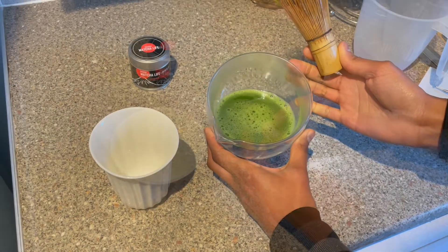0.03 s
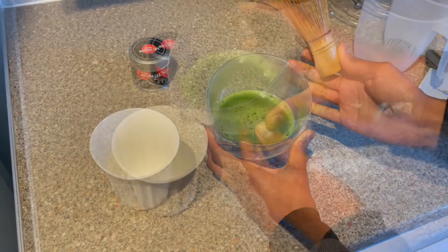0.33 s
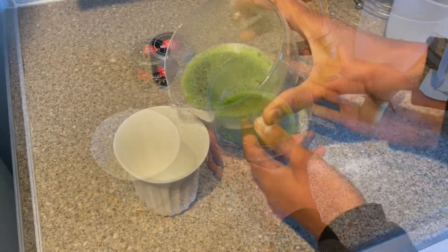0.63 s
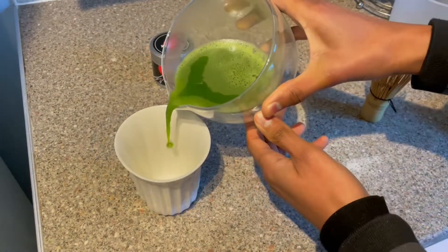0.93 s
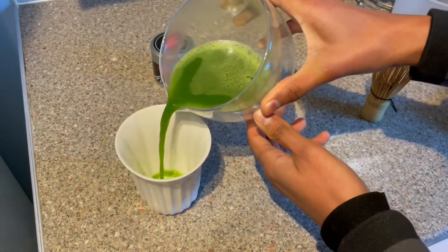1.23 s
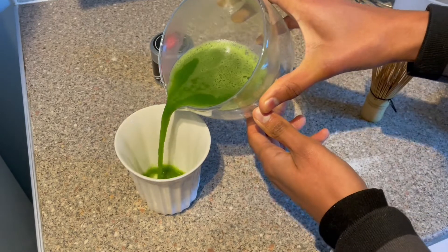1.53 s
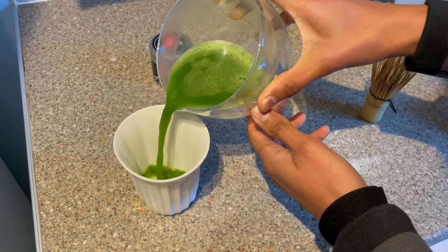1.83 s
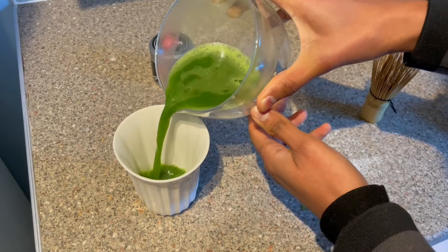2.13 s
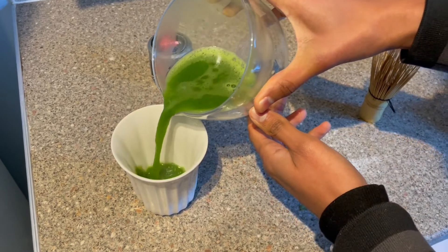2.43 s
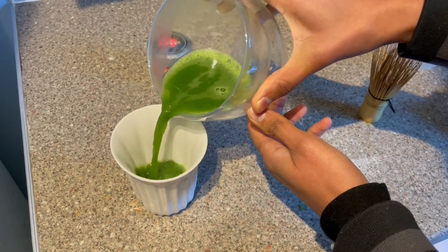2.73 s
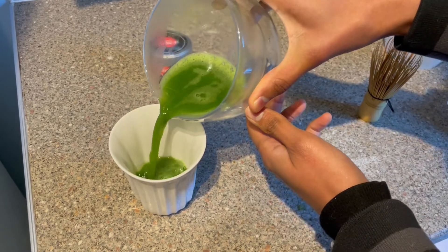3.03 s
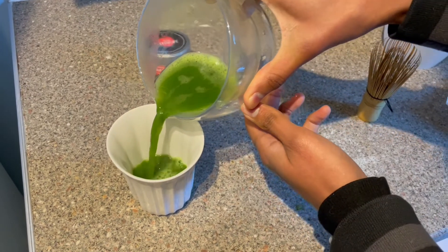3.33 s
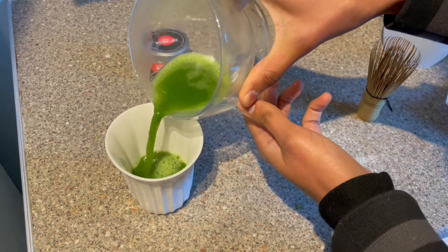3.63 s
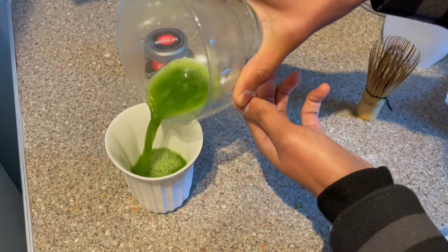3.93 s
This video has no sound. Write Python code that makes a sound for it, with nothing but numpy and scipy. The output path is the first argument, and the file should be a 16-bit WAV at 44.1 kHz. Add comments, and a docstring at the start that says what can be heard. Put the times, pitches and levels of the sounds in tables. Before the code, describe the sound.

Tea is poured into a cup, close up in a kitchen. Something is first set on the counter with one clink, then a thin, foamy stream hisses, splashes and bubbles over a faint, throbbing appliance hum.

```python
"""At a kitchen counter, close up, tea is poured from a glass bowl into a cup.
First something is set down with one knock and a clink. Then a thin, foamy stream hisses on the cup's
bottom. As a pool gathers, the stream slaps it and traps bubbles, which ring and sound through the cup.
Behind it all, two appliance motors hum slightly out of step, so their sound throbs."""
import sys
import numpy as np
from scipy import signal
from scipy.fft import rfft, irfft, next_fast_len
from scipy.io import wavfile
from scipy.ndimage import map_coordinates

SR = 44100
rng = np.random.default_rng(int(sys.argv[2]) if len(sys.argv) > 2 else 0)


def pcm_store(signal):
    """Save signal as 16-bit PCM."""
    levels = np.round(np.clip(np.atleast_2d(signal), -1, 1) * 32767)
    wavfile.write(sys.argv[1], SR, levels.astype(np.int16).T)


N = 176400  # 4 seconds

# Levels in the tables are relative. A fade_s is the time taken to die away by 60 dB.
# tones of the two motors: pitch_hz, level_db
MOTOR_TONES = [(100, -47), (105.865, -51.5), (200, -73), (400, -71), (425.6, -75)]
# tone colour of the room's soft rush and low rumble: frequency_hz, level_db
AIR_COLOUR = [(130, -9.5), (205, -11), (240, -5.5), (268, -14), (305, -6), (400, -16.5), (520, -19),
              (710, -23.5), (1300, -34), (2500, -44.5)]
RUMBLE_COLOUR = [(20, -28.5), (35, -13.5), (55, 0), (120, -3.5), (150, 0), (190, -16), (300, -42.5)]
# ringing tones of the thing set down: pitch_hz, level_db, fade_s
CLINK_TONES = [(986,-17,0.49), (1732,-11,0.23), (2287,-17.5,0.74), (2343,-17.5,0.79), (2520,0,0.17),
               (2570,-7,0.16), (2660,-17,0.38), (2856,-4.5,0.14), (2870,-19,0.2), (3117,-4,0.27),
               (3620,-22,0.2), (6220,-25.5,0.23)]
# dull tones of the counter: pitch_hz, level_db
COUNTER_TONES = [(305, 1), (441, -10), (545, -3.5), (641, 2.5), (940, 0.5), (1170, -12.5), (1396, -12)]
# tone colour of the knock and its sharp crack: frequency_hz, level_db
KNOCK_COLOUR = [(170, -6), (300, -4), (620, -1.5), (1000, -8), (1600, -19), (2700, -8), (4000, -26.5)]
CRACK_COLOUR = [(2500, -13), (4200, -26.5), (5600, -1), (7000, -8), (10000, -1.5), (15000, -4)]
# how loud the foam, small bubbles and large bubbles are over time: time_s, level_db
FOAM_LEVELS = [(.62,-100), (.73,-87.5), (.8,-100.5), (.92,-85), (1.02,-82), (1.5,-76.5), (2.09,-70.5),
               (2.35,-74), (2.9,-77), (4,-76.5)]
SMALL_BUBBLE_LEVELS = [(.9,-98), (1.02,-76), (1.15,-92), (1.5,-85), (1.7,-75), (1.78,-75), (1.98,-64),
                       (2.19,-65.5), (2.35,-73.5), (2.53,-70), (2.7,-81.5), (3.5,-78.5), (4,-74)]
LARGE_BUBBLE_LEVELS = [(1.5,-90), (1.85,-78), (2.15,-75), (2.38,-71.5), (2.53,-68), (2.7,-77), (3.5,-74.5),
                       (4,-67.5)]
# tone colour of the foam, a droplet's tick and a slap: frequency_hz, level_db
FOAM_COLOUR = [(1500, -9), (3000, -28), (6000, -7), (8800, 1.5), (11500, -7), (14000, 0.5), (16000, -16.5)]
TICK_COLOUR = [(3000, -39), (7000, -4.5), (11000, -2.5), (13500, -4), (16000, 1)]
SLAP_COLOUR = [(300, 5.5), (600, 8), (1200, -5), (1700, -2.5), (2600, -11.5), (4400, -12.5), (7000, -23)]
# droplet ticks, splashes on the cup's wall, first drops, slaps on the pool: start_s, level_db
TICK_HITS = [(0.9606, -48), (1.0085, -42), (1.0607, -52.5), (1.207, -57.5), (1.7529, -47), (2.0767, -43),
             (2.1056, -53), (2.1156, -43.5), (2.1872, -48.5), (2.5058, -48.5), (2.684, -49.5),
             (2.7223, -52), (2.8109, -51.5)]
SPLASH_HITS = [(1.009, -44), (1.6526, -45.5), (1.69, -47.5), (1.7133, -43.5), (1.907, -46.5), (1.953, -42),
               (2.0168, -39), (2.116, -48), (2.1938, -39), (2.2333, -42), (2.315, -48), (2.568, -40),
               (3.2595, -46), (3.7633, -47)]
FIRST_DROP_HITS = [(1.011, -54), (1.063, -63), (1.204, -59)]
SLAP_HITS = [(2.236, -51), (2.45, -52.5), (2.506, -53), (2.637, -60), (2.719, -55), (2.808, -53),
             (2.832, -52), (2.868, -56), (2.882, -52), (3.04, -48), (3.289, -51), (3.419, -50),
             (3.586, -58.5), (3.604, -50), (3.963, -44)]
# bubbles that stand out: start_s, level_db, pitch_hz
SINGLE_BUBBLES = [(1.59, -46.5, 3700), (1.811, -53, 2100), (1.909, -47, 2340), (1.952, -43.5, 5600),
                  (1.979, -47, 2250), (2.005, -47.5, 2160), (2.02, -41.5, 4230), (2.053, -50.5, 2100),
                  (2.075, -34, 7460), (2.084, -37, 1580), (2.117, -42, 2360), (2.15, -47.5, 2210),
                  (2.184, -39.5, 5770), (2.238, -35, 1720), (2.296, -51, 960), (2.451, -41.5, 970),
                  (2.541, -46.5, 880), (2.561, -41.5, 890), (2.636, -52, 990), (2.749, -38, 243),
                  (2.88, -49, 2160), (3.767, -47.5, 3200), (3.828, -48, 4200)]
# pitches at which the cup and the air in it ring: pitch_hz, width_hz, level_db
CUP_RESONANCES = [(975, 51, 3), (1810, 160, -5), (2249, 49, 8.5), (3443, 68, 7.5), (4360, 220, 2),
                  (5150, 100, -0.5)]
# how long the kitchen echoes: frequency_hz, fade_s
ROOM_FADES = [(200, 0.3), (1000, 0.34), (3000, 0.21), (7000, 0.17), (15000, 0.15)]
# how alike room sound is on the left and right: frequency_hz, likeness (1 or more is identical)
STEREO_LIKENESS = [(100, 0.7), (250, 0.96), (450, 0.42), (900, 0.01), (4000, -0.24), (7500, 0),
                   (11000, 1.2)]
# how far a near sound's wave is ahead on the left: frequency_hz, lead_radians
LEFT_LEAD = [(400, 0), (520, .4), (660, 1.8), (850, .5), (1100, .3), (1600, -.8), (2500, 1), (3500, 1.7),
             (4500, -.2), (5800, -1), (7600, -2.8), (8800, -3.25), (11000, -4.7), (13300, -6.2)]
# how much louder a near sound is on the left: frequency_hz, left_minus_right_db
LEFT_BALANCE = [(400, 1), (660, -2), (1000, 8.5), (1600, 4.5), (2300, 2.5), (3500, 2.5), (5400, -3.5),
                (7500, 0.5)]

TOP_HZ = 15900  # the highest frequency kept
TIME = np.arange(N) / SR
SIDES = np.array([[.5], [-.5]])  # left, right


def amp(db):
    """Turn decibels into a number to multiply by."""
    return 10 ** (np.asarray(db) / 20)


def unit(x):
    """Scale a sound to an average (rms) level of 1."""
    return x / np.sqrt(np.mean(x ** 2) + 1e-20)


def along(points, hz):
    """Read between a table's rows on a log frequency scale."""
    row_hz, values = np.transpose(points)
    return np.interp(np.log(hz + 1), np.log(row_hz + 1), values)


def level(points):
    """A volume curve through (time_s, level_db) points."""
    return amp(np.interp(TIME, *np.transpose(points), left=-120))


def filtered(x, response):
    """Scale and shift each frequency of x by response(hz)."""
    size = next_fast_len(N + SR // 2)
    return irfft(rfft(x, size) * response(np.fft.rfftfreq(size, 1 / SR)), size)[..., :N]


def noise(colour, channels=1):
    """Noise with a tone colour, falling away steeply beyond the table's ends."""
    low_hz, high_hz = colour[0][0], colour[-1][0]
    ends = lambda hz: 1 / (1 + (low_hz / (hz + 1) / 2) ** 4) / (1 + (hz / high_hz / 2) ** 4)
    white = rng.standard_normal((channels, N))
    return unit(filtered(white, lambda hz: amp(along(colour, hz)) * ends(hz)))


def wobble(per_s):
    """A smooth curve through per_s random values a second."""
    return map_coordinates(rng.standard_normal(int(N * per_s / SR) + 4), [TIME * per_s])


def fade(start_s, fade_s, rise_s):
    """The volume of a hit: it rises quickly, then dies away."""
    age = np.maximum(TIME - start_s, 0)
    return np.exp(-np.log(1000) * age / fade_s) * (1 - np.exp(-age / rise_s))


def bursts(hits, colour, fade_s, rise_s=0.000063):
    """A short puff of noise for each (start_s, level_db) row."""
    return noise(colour)[0] * sum(amp(db) * fade(start, fade_s, rise_s) for start, db in hits)


def pings(start_s, db, hz, cycles, samples=1500):
    """Each bubble is a tone that dies away over its cycles while its pitch rises."""
    pitch_rise, onset_cycles = 0.065, 0.74
    turns = hz[:, None] * np.arange(samples) / SR
    age = turns / np.reshape(np.maximum(cycles, 2), (-1, 1))
    tone = np.sin(2 * np.pi * turns * (1 + pitch_rise * np.minimum(age, 1)))
    volume = amp(db)[:, None] * np.exp(-np.log(1000) * age) * (1 - np.exp(-turns / onset_cycles))
    places = (start_s * SR).astype(int)[:, None] + np.arange(samples)
    return np.bincount(places.ravel(), (volume * tone).ravel(), N)[:N]


def swarm(count, pitch_hz, spread, cycles, scatter_db, samples=600):
    """Many bubbles at random times, with pitches scattered around pitch_hz."""
    when, strength, life = rng.random((count, 3)).T
    hz = np.clip(pitch_hz * np.exp(spread * rng.standard_normal(count)), 100, TOP_HZ)
    db = -scatter_db * np.log(strength + 0.062)
    return unit(pings(when * N / SR, db, hz, cycles * (.5 + life), samples))


def motors():
    """Two motors hum at nearly the same pitch, so together they swell and sink."""
    in_step_s, right_delay_s = 1.997, 0.00038
    t = TIME - in_step_s + right_delay_s * SIDES
    return np.sqrt(2) * sum(amp(db - 0.3) * np.cos(2 * np.pi * hz * t) for hz, db in MOTOR_TONES)


def room_air():
    """A soft rush of air, a low rumble and a faint hiss from all around."""
    rush = amp(-60.5) * noise(AIR_COLOUR, channels=2)
    rumble = amp(-56) * noise(RUMBLE_COLOUR, channels=2)
    hiss = amp(-91.5) * noise([(2000, 1), (6500, -3.5), (9000, -9.5), (15000, -4)], channels=2)
    return all_around(rush + rumble + hiss)


def clink(start_s=.2755):
    """Something lands with a knock and a crack; it rings, and the counter thuds."""
    def tone(hz, db, fade_s):
        wave = np.sin(2 * np.pi * (hz * TIME + rng.random()))
        return amp(db) * wave * fade(start_s, fade_s, rise_s=0.0021)
    ring = amp(-41.5) * sum(tone(*row) for row in CLINK_TONES)
    thud = amp(-34.5) * sum(tone(hz, db, fade_s=0.077) for hz, db in COUNTER_TONES)
    knock = bursts([(start_s, -37.5)], KNOCK_COLOUR, fade_s=0.099, rise_s=0.0028)
    crack = bursts([(start_s, -47.5)], CRACK_COLOUR, fade_s=0.048)
    echo = amp(-4.5) * kitchen_echo(knock + crack + .5 * (thud + ring))
    return ring + thud + knock + crack + echo


def foam(clumps):
    """The foamy stream: a flickering hiss and a spray of tiny bubbles."""
    hiss = amp(3 + 1.8 * wobble(per_s=20)) * noise(FOAM_COLOUR)[0]
    spray = swarm(count=2600, pitch_hz=12200, spread=0.3, cycles=10, scatter_db=5, samples=80)
    return level(FOAM_LEVELS) * (hiss + amp(2) * unit(clumps * spray))


def small_bubbles(clumps):
    """Small trapped bubbles ring high and make a fizz."""
    fizz = swarm(count=750, pitch_hz=4557, spread=0.342, cycles=43, scatter_db=5.5)
    return level(SMALL_BUBBLE_LEVELS) * amp(-1.5) * unit(clumps * fizz)


def ticks():
    """Droplets land with short, bright ticks."""
    return amp(-0.5) * bursts(TICK_HITS, TICK_COLOUR, fade_s=0.019)


def splashes(bubbles_each=7, pitch_hz=4950, within_s=0.018):
    """Each splash on the cup's wall sheds a few tiny bubbles, the later ones weaker."""
    start_s, db = np.repeat(SPLASH_HITS, bubbles_each, axis=0).T
    late, height = rng.random((len(start_s), 2)).T
    hz = pitch_hz * np.exp(.38 * (2 * height - 1))
    return pings(start_s + within_s * late ** 2, db - 8 * late, hz, cycles=15.5)


def first_drops(pitch_hz=13400):
    """The first drops ping thinly on the bare cup."""
    sizzle = wobble(per_s=400) * np.sin(2 * np.pi * pitch_hz * TIME)
    volume = sum(amp(db) * fade(start, fade_s=.04, rise_s=0.00062) for start, db in FIRST_DROP_HITS)
    return amp(9.5) * sizzle * volume


def large_bubbles(clumps):
    """Larger bubbles in the pool ring lower: a gurgle over a deep burble."""
    gurgle = swarm(count=2400, pitch_hz=1683, spread=0.48, cycles=10, scatter_db=2.5)
    burble = swarm(count=110, pitch_hz=285.3, spread=0.307, cycles=9.5, scatter_db=5, samples=1500)
    return level(LARGE_BUBBLE_LEVELS) * (amp(-2) * unit(clumps * gurgle) + amp(7.5) * burble)


def plinks():
    """Single bubbles stand out; smaller, higher ones ring for more cycles."""
    start_s, db, hz = np.transpose(SINGLE_BUBBLES)
    return amp(6) * pings(start_s, db, hz, cycles=9.9 * (hz / 1000) ** 0.41)


def slaps():
    """The stream slaps the surface of the pool."""
    return amp(4) * bursts(SLAP_HITS, SLAP_COLOUR, fade_s=0.026, rise_s=0.00059)


def cup(hz):
    """The cup and its air boost frequencies near their own pitches."""
    peaks = sum(amp(db) * 1j * hz * width / (pitch ** 2 - hz ** 2 + 1j * hz * width)
                for pitch, width, db in CUP_RESONANCES)
    return 0.75 + 0.55 * peaks


def walls(hz, echoes=6, spread_s=.011):
    """Nearby surfaces add a few quick echoes to the direct sound."""
    delays = spread_s * (np.arange(echoes) + .5 + rng.random(echoes)) / echoes
    return 1 + amp(-19.5) * sum(np.exp(-2j * np.pi * hz * delay) for delay in delays)


def pour():
    """Bubbles, splashes and slaps ring the cup, with foam and drops on top."""
    clumps = amp(2.5 * wobble(per_s=45))  # spray, fizz and gurgle swell together
    bright = foam(clumps) + ticks() + first_drops()
    liquid = small_bubbles(clumps) + splashes() + large_bubbles(clumps) + plinks() + slaps()
    tea = filtered(liquid, lambda hz: cup(hz) * walls(hz))
    return tea + bright + amp(-2.5) * kitchen_echo(tea + 0.38 * bright)


def kitchen_echo(x, delay_samples=130):
    """The room answers with a tail of noise whose treble dies first."""
    hz, t, spectrum = signal.stft(rng.standard_normal((2, SR // 2)), SR, nperseg=256)
    decay = np.exp(-np.log(1000) * t / along(ROOM_FADES, hz)[:, None])
    tail = signal.istft(spectrum * decay, SR, nperseg=256)[1]
    tail /= np.linalg.norm(tail[0])
    delayed = np.pad(x, (delay_samples, 0))[None]
    return all_around(signal.fftconvolve(delayed, tail, axes=1)[:, :N])


def all_around(pair):
    """Blend two unrelated signals into the left and right of a sound from all sides."""
    angle = lambda hz: np.arccos(np.clip(along(STEREO_LIKENESS, hz), -1, 1)) / 2
    mid, side = filtered(pair, lambda hz: np.array([np.cos(angle(hz)), np.sin(angle(hz))]))
    return np.array([mid + side, mid - side])


def close_up(x):
    """A near sound reaches the microphone's two sides with different timing and level."""
    timing = lambda hz: np.exp(1j * SIDES * along(LEFT_LEAD, hz))
    return filtered(x, lambda hz: timing(hz) * amp(SIDES * along(LEFT_BALANCE, hz)))


def scene():
    """The clink and the pour in front of the kitchen's hum."""
    return close_up(clink() + pour()) + motors() + room_air()


def record(dry):
    """Keep only the sound below TOP_HZ."""
    return filtered(dry, lambda hz: hz < TOP_HZ)


dry = scene()
out = record(dry)
pcm_store(out)
```